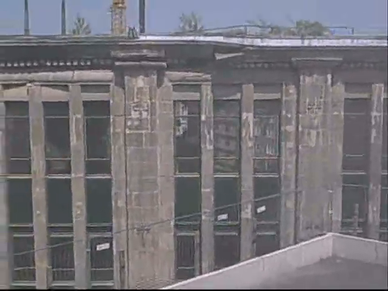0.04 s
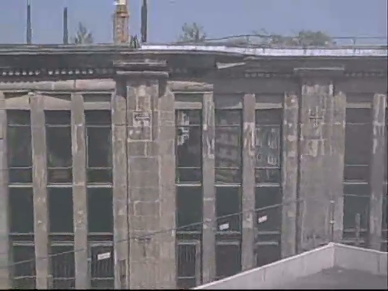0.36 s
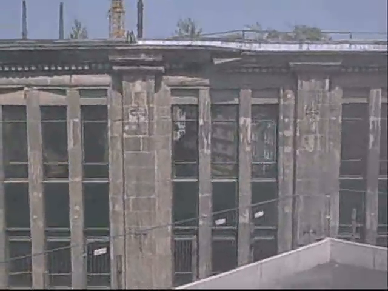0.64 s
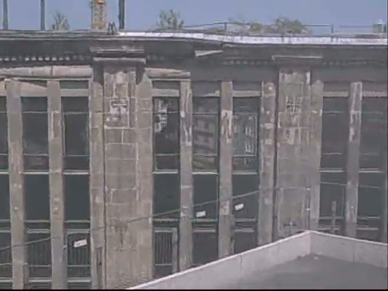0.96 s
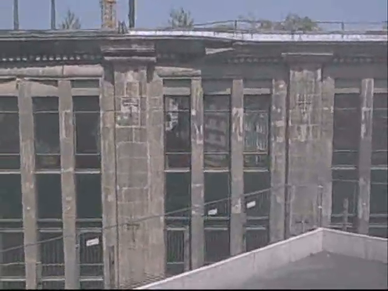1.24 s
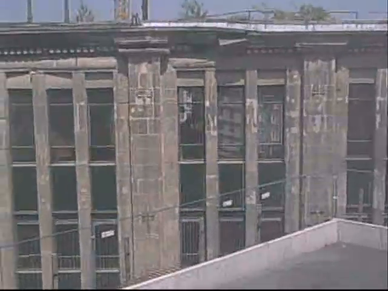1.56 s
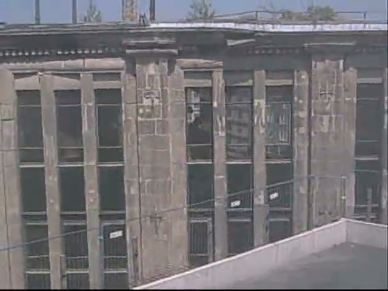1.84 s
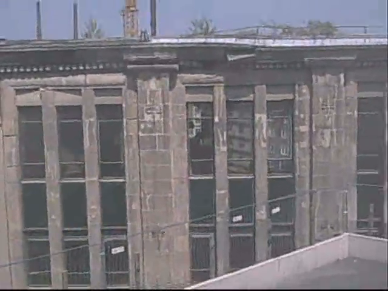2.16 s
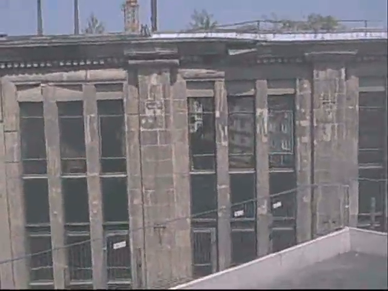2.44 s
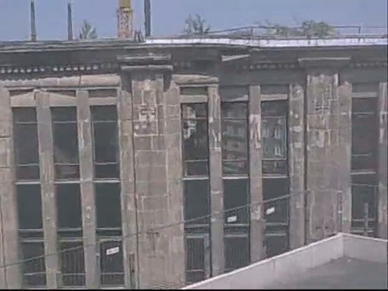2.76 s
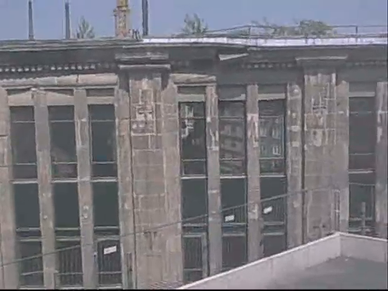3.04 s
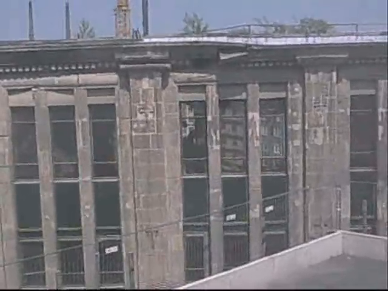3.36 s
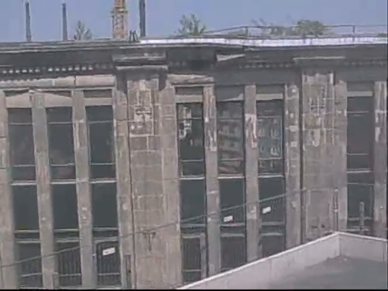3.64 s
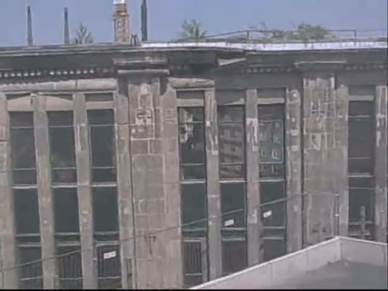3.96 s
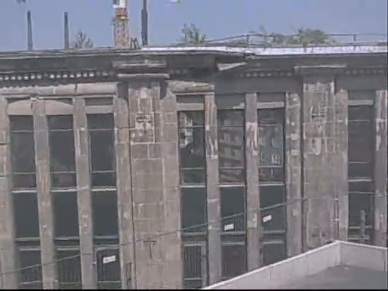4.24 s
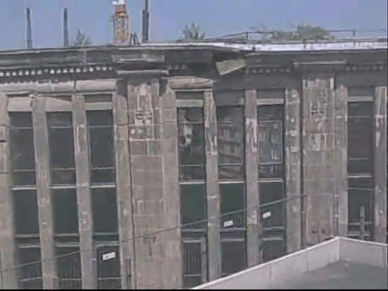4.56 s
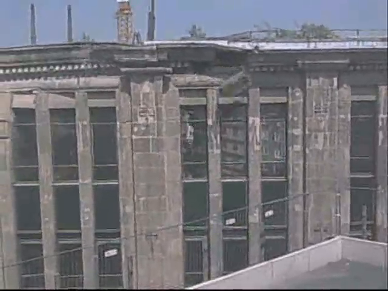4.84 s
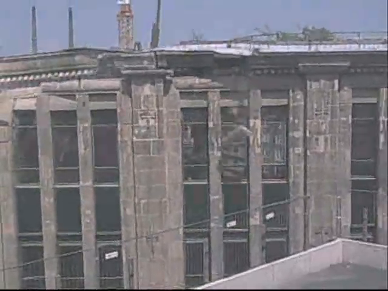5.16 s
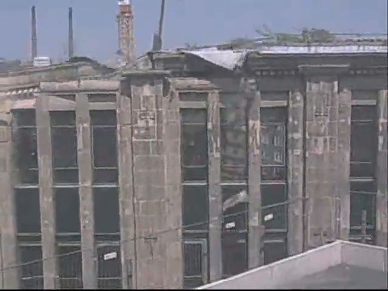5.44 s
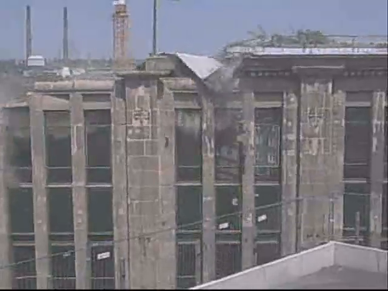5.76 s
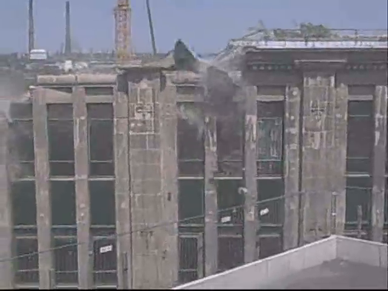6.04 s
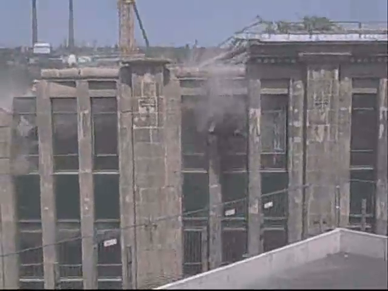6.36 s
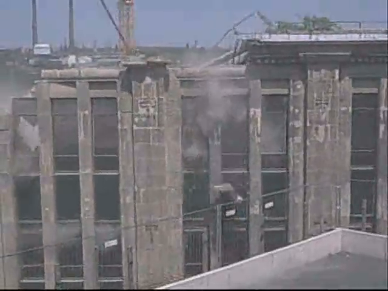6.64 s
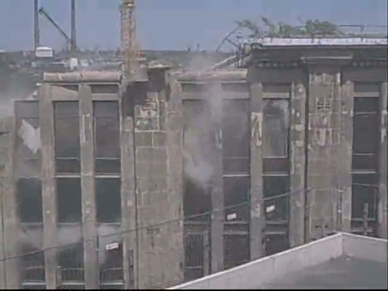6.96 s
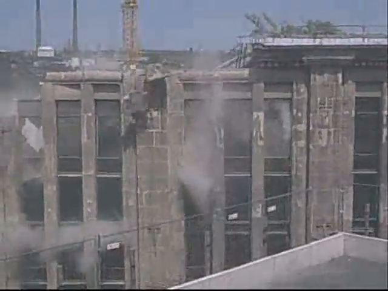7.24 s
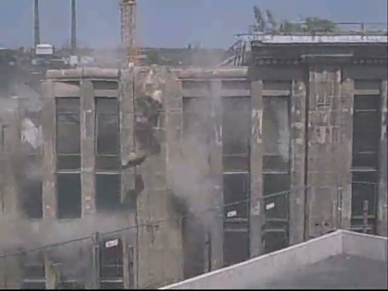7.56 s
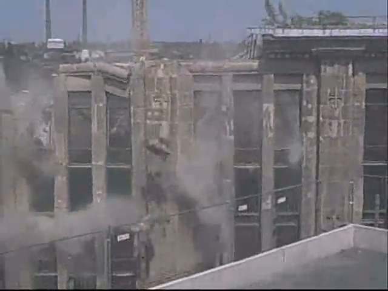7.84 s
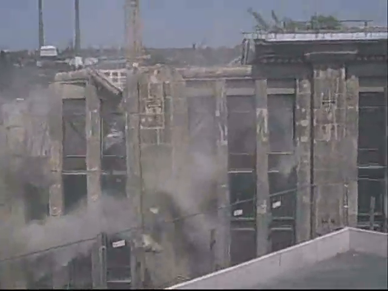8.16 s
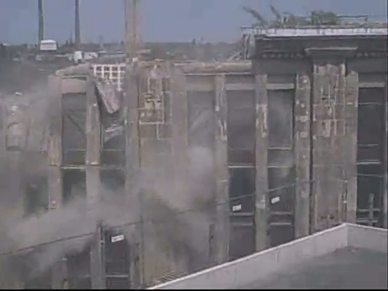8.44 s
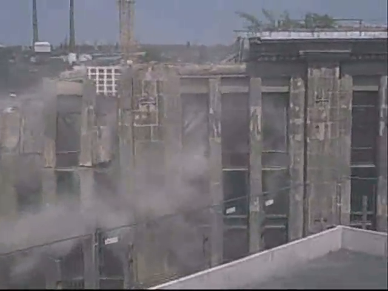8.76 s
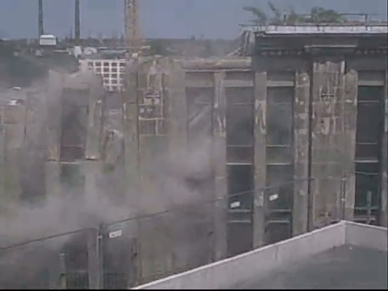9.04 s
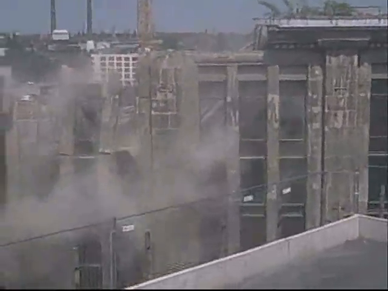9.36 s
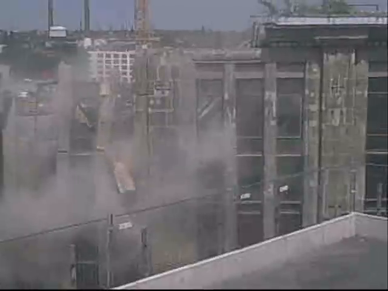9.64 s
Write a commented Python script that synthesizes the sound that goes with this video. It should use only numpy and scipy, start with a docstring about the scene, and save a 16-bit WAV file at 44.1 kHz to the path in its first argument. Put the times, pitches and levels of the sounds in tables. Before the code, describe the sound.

For the first four seconds a city street is quiet: distant traffic murmurs and a diesel machine drones, swelling slightly under load. Steel squeals briefly far off at about one second. Near four seconds stone begins to crack, faintly at first, and debris starts to trickle. Between 4.5 and 5 seconds a metal roof edge buckles with several soft, hollow booms. The cracks grow sharper, and slabs, bricks and grit pour down, merging into a loud roar by about seven seconds. Breaking glass clinks above it between 5.4 and 8.5 seconds. Heavy sections land with dull knocks and low thuds, echoing briefly between the walls. The heaviest fall comes just after nine seconds, and the roar is still going at the end, near ten seconds. A small microphone across the street adds a gritty treble and overloads slightly on the biggest impacts.

```python
"""Demolition of a stone facade

Across a city street, traffic murmurs, a diesel machine drones and steel squeals far off. Then masonry
cracks, the metal roof edge buckles, glass breaks, and slabs, blocks, bricks and grit pour down between
the house walls: thousands of damped collisions that merge into a roar. A small camera's slow converter
overloads on the heaviest falls and holds each sample, which adds a gritty treble."""
import sys
import numpy as np
from scipy import signal
from scipy.fft import rfft, irfft, next_fast_len
from scipy.io import wavfile
from scipy.ndimage import map_coordinates

SR = 44100
rng = np.random.default_rng(int(sys.argv[2]) if len(sys.argv) > 2 else 0)


def unload_wav(signal):
    """Save mono or channel-first audio to the path in sys.argv[1] as 16-bit WAV at rate SR, clipped to [-1, 1]."""
    wavfile.write(
        sys.argv[1],
        SR,
        np.round(np.clip(np.atleast_2d(signal).T, -1, 1) * 32767).astype(np.int16),
    )


N = 427329
TIME = np.arange(N) / SR


def amp(db):
    """Amplitude ratio of a level in decibels."""
    return 10 ** (np.asarray(db) / 20)


def unit(x):
    """Normalisation to rms 1."""
    return x / np.sqrt(np.mean(x ** 2) + 1e-20)


def along(points, hz):
    """Interpolation of (Hz, value) points on a logarithmic frequency axis."""
    freqs, values = np.transpose(points)
    return np.interp(np.log(hz + 1), np.log(freqs + 1), values)


def wobble(rate):
    """Smooth random modulation: a spline through `rate` Gaussian values a second."""
    return map_coordinates(rng.standard_normal(int(N * rate / SR) + 4), [TIME * rate])


def swell(centre, half_width):
    """A Gaussian envelope, with times in seconds."""
    return np.exp(-((TIME - centre) / half_width) ** 2)


def filtered(x, response):
    """Linear filtering: the spectrum is multiplied by a frequency response."""
    size = next_fast_len(len(x) + SR // 10)
    return irfft(rfft(x, size) * response(np.fft.rfftfreq(size, 1 / SR)), size)[:len(x)]


def noise(spectrum, size):
    """White noise shaped to a spectrum, at rms 1."""
    return unit(filtered(rng.standard_normal(size), lambda hz: amp(along(spectrum, hz))))


def add(track, start, sound):
    """Superposition of a sound on the track, from `start` seconds."""
    part = track[round(start * SR):][:len(sound)]
    part += sound[:len(part)]


def burst(spectrum, attack, t60):
    """Struck stone has dense, heavily damped modes, which merge into decaying noise."""
    t = np.arange(SR // 2) / SR
    return noise(spectrum, size=len(t)) * (1 - np.exp(-t / attack)) * amp(-60 * t / t60)


def ring(hz, width_hz, t60):
    """Free decay of a cluster of close modes around one frequency."""
    t = np.arange(SR // 2) / SR
    cluster = filtered(rng.standard_normal(len(t)), lambda f: 1 / (1 + ((f - hz) / width_hz) ** 2))
    return unit(cluster) * (1 - np.exp(-t / .0056)) * amp(-60 * t / t60)


# Decay between the house walls. Each row: frequency in Hz, reverberation time in seconds.
STREET_T60 = [(100, 0.41), (1000, 0.84), (4000, 0.3)]

def street(x, wet_db):
    """Reverberation: wall reflections form a diffuse tail whose treble dies first."""
    hz, t, spectra = signal.stft(rng.standard_normal(SR // 2), SR, nperseg=256)
    decay = amp(-60 * t / along(STREET_T60, hz)[:, None])
    _, tail = signal.istft(spectra * decay, SR, nperseg=256)
    return x + amp(wet_db) * signal.fftconvolve(x, tail / np.linalg.norm(tail))[:len(x)]


# Rush of traffic and of the machine. Each row: frequency in Hz, relative spectral density in dB.
RUSH_SPECTRUM = [(15, -44), (25, -15), (63, -9.5), (93, -12.5), (125, -9), (296, -8), (322, -10),
                 (502, -11), (620, -7.5), (750, -9), (889, -8.5), (1940, -20.5), (3220, -17.5), (3900, -21),
                 (5070, -55), (8580, -120)]

def traffic():
    """Distant vehicles add incoherently to a gently wavering noise."""
    return amp(-42 + .62 * wobble(rate=12)) * noise(RUSH_SPECTRUM, size=N)


# The machine takes load. Each row: centre in seconds, half width in seconds, added tone level in dB.
ENGINE_LOADS = [(.6, .1, -49), (1.68, 0.066, -47), (2.322, 0.29, -47), (3.0, .06, -51)]

def diesel_machine(firing_hz=97.6, idle_db=-57.5):
    """Periodic firing gives a harmonic drone; its fundamental and a rush of noise swell under load."""
    load = sum(amp(db) * swell(centre, half_width) for centre, half_width, db in ENGINE_LOADS)
    uneven_hz = firing_hz * (1 + .0266 * wobble(rate=36))
    phase = 2 * np.pi * np.cumsum(uneven_hz) / SR
    exhaust = np.hypot(amp(idle_db), load) * amp(2.1 * wobble(rate=12)) * np.sin(phase)
    overtones = np.sin(2 * phase) + amp(-3.5) * np.sin(3 * phase)
    casing = amp(-54.5 + 1.8 * wobble(rate=8.9)) * overtones
    rush = amp(-10) * load * noise(RUSH_SPECTRUM, size=N)
    return exhaust + casing + rush


def steel_squeal(start_s=.7, loudest_s=.83, end_s=1.25, slip_gap_s=.039):
    """Stick-slip friction: strained steel gives a short tone at each slip."""
    rise_db_per_s, fade_db_per_s = 68, 36
    out = np.zeros(N)
    for slip in np.arange(start_s, end_s, slip_gap_s):
        db = -33.3 - max(rise_db_per_s * (loudest_s - slip), fade_db_per_s * (slip - loudest_s))
        hz = rng.normal(785, 16)
        phase = 2 * np.pi * hz * TIME + .5 * wobble(rate=80)
        tone = np.sin(phase) + amp(-22) * np.sin(2 * phase)
        out += amp(db) * swell(slip, half_width=.017) * tone
    return street(out, wet_db=-10)


# Resonances of the roof edge. Each row: frequency in Hz, half width in Hz, relative level in dB.
ROOF_MODES = [(330, 28, -0.5), (657, 56, 0)]
# The sheet gives way. Each row: start in seconds, relative level in dB.
ROOF_BUCKLES = [(4.514, -23), (4.548, -22), (4.608, -31), (4.648, -23.5), (4.729, -25.5), (4.8, -44),
                (4.86, -27)]

def roof_edge():
    """Buckling excites the modes of the metal sheet, each time with a hollow boom."""
    out = np.zeros(N)
    for start, db in ROOF_BUCKLES:
        boom = sum(amp(mode_db) * ring(hz, width, t60=.29) for hz, width, mode_db in ROOF_MODES)
        add(out, start, amp(db - 3) * boom)
    return out


# Windows shatter. Each row: start in seconds, ring frequency in Hz, relative level in dB.
PANE_BREAKS = [(5.387, 3300, -26), (5.734, 3360, -20), (6.468, 3510, -18), (6.685, 3300, -17),
               (6.765, 3590, -16.5), (8.15, 3270, -19), (8.177, 3310, -12), (8.18, 3070, -17),
               (8.453, 3430, -20)]

def window_panes():
    """Breaking glass vibrates freely in high modes, clinking above the roar."""
    out = np.zeros(N)
    for start, hz, db in PANE_BREAKS:
        add(out, start, amp(db + 2) * ring(hz, width_hz=80, t60=.19))
    return out


# Stone snapping, and stone knocked. Each row: frequency in Hz, relative spectral density in dB.
SNAP_SPECTRUM = [(900, -11), (1200, 6.5), (1900, -0.5), (2600, -10), (3200, 7.5), (3600, 2), (4000, -2)]
KNOCK_SPECTRUM = [(80, -22), (170, -7), (280, 8), (440, -17), (620, 2), (810, 3), (1000, 3), (1300, -7),
                  (1800, -19), (3500, -9.5)]
# Fractures. Each row: start in seconds, relative level in dB, knock offset in dB, T60 in seconds.
STONE_CRACKS = [(3.926, -38, 21, .03), (4.1116, -24.5, 0, .085), (4.3086, -26.5, 3, .07),
                (4.365, -32, 15, .1), (4.3997, -23, 1, .07), (4.736, -21, 2, .09), (5.0208, -20, 1, .09),
                (5.2238, -15, 6, .09), (5.3632, -15, -2, .1), (5.3867, -10, 4, .065), (5.7249, -7, -2, .08),
                (5.734, -6, -3, .08), (5.7658, -8.5, -6, .07), (5.8433, -12.5, 0, .07),
                (6.4672, -9.5, 3, .13), (6.6822, -4.5, -3, .13), (7.18, -8, -3, .09), (7.6889, -8, 1, .07),
                (7.969, -7, 1, .15), (8.4522, -3, -4, .05), (8.6379, -7, 9, .065), (9.2836, 0, -1, .08)]

def stone_cracks():
    """Brittle fracture: a bright snap, with a dull knock from the piece behind it."""
    out = np.zeros(N)
    for start, db, knock_db, t60 in STONE_CRACKS:
        snap = amp(db - 3) * burst(SNAP_SPECTRUM, attack=.0004, t60=t60)
        knock = amp(db + knock_db - 5) * burst(KNOCK_SPECTRUM, attack=.00089, t60=t60)
        add(out, start, street(snap + knock, wet_db=-10))
    return out


# The shaken ground. Each row: frequency in Hz, relative spectral density in dB.
BOOM_SPECTRUM = [(25, -20), (60, 0), (120, 4), (220, -17), (600, -50)]
# Heavy sections land. Each row: start in seconds, length of the debris surge in seconds,
# then relative levels in dB of the knock, the bricks and the slabs.
HEAVY_FALLS = [(4.369, .06, -22, -36.5, -40.5), (4.515, .08, -25, -34.5, -41), (4.87, 0.072, -26, -40, -46),
               (5.196, 0.13, -9, -29, -41), (5.553, 0.042, -11, -22.5, -46), (6.152, .02, -1.5, -33, -31),
               (6.213, 0.11, -19, -28, -26), (6.5, 0.03, -14, -37, -26), (6.61, 0.033, -15, -27, -24.5),
               (6.665, .24, -9, -18.5, -29.5), (7.156, 0.094, -3, -17, -28), (7.267, 0.073, -1, -21.5, -30),
               (7.463, 0.045, -4, -16, -36), (7.815, 0.076, -10, -19.5, -27), (7.912, 0.15, -1, -15, -36),
               (8.888, 0.11, -6, -14, -24), (9.228, 0.092, 6.5, -11.5, -21.5), (9.322, 0.14, 1, -12.5, -30)]

def heavy_falls(t60=.079, cutoff_hz=2200):
    """The impact of a large mass gives a knock with little treble and a longer boom from the ground."""
    out = np.zeros(N)
    for start, _, knock_db, _, slab_db in HEAVY_FALLS:
        knock = amp(knock_db - 8) * burst(KNOCK_SPECTRUM, attack=.001, t60=t60)
        knock = filtered(knock, lambda hz: 1 / np.hypot(1, (hz / cutoff_hz) ** 2))
        boom = amp(slab_db - 5) * burst(BOOM_SPECTRUM, attack=.0066, t60=2 * t60)
        add(out, start, street(knock + boom, wet_db=-11))
    return out


def debris_surges(rise_s=.012, settle_t60=.4):
    """Slab and brick envelopes: after each fall debris spreads, holds and settles, adding in power."""
    slab_power, brick_power = np.zeros((2, N))
    for start, length, _, brick_db, slab_db in HEAVY_FALLS:
        rise = np.clip((TIME - start) / rise_s, 0, 1)
        settle = amp(-60 * np.maximum(TIME - start - length, 0) / settle_t60)
        slab_power += (amp(slab_db) * rise * settle) ** 2
        brick_power += (amp(brick_db) * rise * settle) ** 2
    return np.sqrt(slab_power), np.sqrt(brick_power)


COLLAPSE_S = 3.97
# Pouring masonry. Each row: frequency in Hz, relative spectral density in dB.
RUBBLE_SPECTRUM = [(18, -45), (32, -26), (58, -15.5), (150, -9.5), (262, -3), (440, -8.5), (640, 1.5),
                   (810, 2), (1060, -3), (1300, -0.5), (2160, -13), (2820, -11.5), (3200, -5.5),
                   (3900, -12.5)]

def collisions(lo_hz, hi_hz, cycles, spread_db, wash_db, count):
    """Shot noise from one size of debris: randomly timed sinusoids, each falling 60 dB in `cycles`."""
    def colour(f):
        band = 1 / np.sqrt((1 + (f / hi_hz) ** 16) * (1 + (lo_hz / (f + 1)) ** 16))
        return amp(along(RUBBLE_SPECTRUM, f)) * band

    when, pitch, weight, phase = rng.random((4, count, 1))
    hz = lo_hz * .8 + pitch * (hi_hz * 1.2 - lo_hz * .8)
    samples = np.arange(int(cycles * SR / lo_hz))
    age_cycles = hz * samples / SR
    strength = amp(spread_db * np.minimum(-np.log(1 - weight), 3.5))  # exponential spread of levels
    rings = strength * np.sin(2 * np.pi * (age_cycles + phase)) * amp(-60 * age_cycles / cycles)
    first = int(COLLAPSE_S * SR)
    positions = (first + when * (N - first)).astype(int) + samples
    impacts = np.bincount(positions.ravel(), rings.ravel(), N)[:N]
    # High pieces ring briefly, so they need more amplitude for the same energy.
    direct = filtered(impacts, lambda f: colour(f) * np.sqrt(f))
    # Collisions behind the facade arrive only as a diffuse wash.
    wash = unit(filtered(rng.standard_normal(N), colour))
    return (direct / np.std(direct[first:]) + amp(wash_db) * wash) / np.hypot(1, amp(wash_db))


# The steady pour. Each row: time in seconds, relative brick level in dB, relative grit level in dB.
POUR_LEVELS = [(3.97, -50, -52), (4.21, -41.5, -52.5), (4.61, -30, -42), (5.29, -25, -34.5),
               (5.8, -18.5, -29.5), (5.93, -19, -27.5), (6.5, -16, -26.5), (6.87, -12.5, -22),
               (7.25, -14, -20.5), (7.79, -14, -23.5), (7.98, -11, -20), (8.19, -14, -21.5),
               (8.48, -14.5, -22.5), (8.77, -11, -17.5), (9.34, -12.5, -21), (9.69, -13, -23.5)]

def avalanche(full_pour_db=-11.5, build_s=.13):
    """Five sizes of debris, the smaller ringing higher; in each, pour and surges add in power."""
    slabs = collisions(33, 157, cycles=2.6, spread_db=.5, wash_db=9, count=500)
    blocks = collisions(158, 476, cycles=9.7, spread_db=2.5, wash_db=2, count=1600)
    bricks = collisions(466, 1358, cycles=10.4, spread_db=2, wash_db=2.5, count=3500)
    chips = collisions(1485, 2220, cycles=25, spread_db=.5, wash_db=2, count=3500)
    grit = collisions(2315, 3970, cycles=59, spread_db=-1, wash_db=8.5, count=5000)

    times, brick_levels, grit_levels = np.transpose(POUR_LEVELS)
    brick_db = np.interp(TIME, times, brick_levels)
    grit_db = np.interp(TIME, times, grit_levels)
    # The large sizes follow the bricks; chips follow both bricks and grit.
    slab_db = -33 + .6 * (brick_db - full_pour_db)
    block_db = -22.5 + .79 * (brick_db - full_pour_db)
    chip_db = -4.5 + .39 * brick_db + .61 * grit_db

    slab_surge, brick_surge = debris_surges()
    slabs *= np.hypot(amp(slab_db), slab_surge)
    blocks *= np.hypot(amp(block_db), np.sqrt(slab_surge * brick_surge))
    bricks *= np.hypot(amp(brick_db - 1.5), brick_surge)
    chips *= np.hypot(amp(chip_db), amp(-13) * brick_surge)
    grit *= np.hypot(amp(grit_db + 2.5), amp(-9.5) * brick_surge)
    showers = amp(.55 * wobble(rate=91) + .6 * wobble(rate=6))  # fine debris lands in clumps
    onset = np.clip((TIME - COLLAPSE_S) / build_s, 0, 1)
    return onset * (slabs + blocks + bricks + showers * (chips + grit))


def scene():
    """Superposition of all sources at one point, in mono."""
    background = traffic() + diesel_machine() + steel_squeal()
    collapse = roof_edge() + window_panes() + stone_cracks() + heavy_falls() + avalanche()
    return (background + collapse)[None]


def record(dry):
    """Clipping and zero-order hold: holding each slow sample mirrors the spectrum into the treble."""
    clock_hz, input_cutoff_hz, output_cutoff_hz = 8000, 4030, 15550
    narrow = filtered(dry[0], lambda hz: 1 / (1 + (hz / input_cutoff_hz) ** 60))
    clipped = np.clip(narrow - .0095, -.95, .95)  # the converter's zero sits slightly off centre
    held = np.interp(np.floor(TIME * clock_hz) / clock_hz, TIME, clipped)
    return filtered(held, lambda hz: hz < output_cutoff_hz)[None]


dry = scene()
out = record(dry)
unload_wav(out)
```